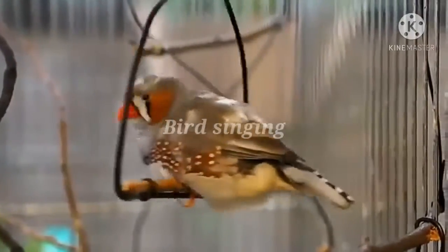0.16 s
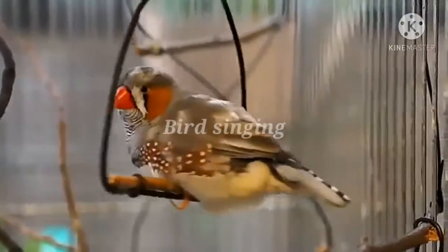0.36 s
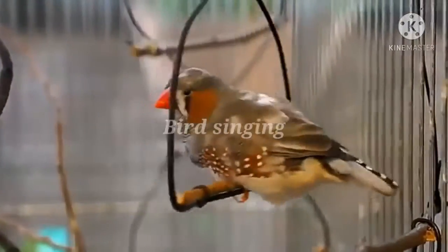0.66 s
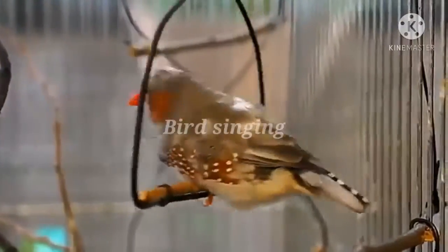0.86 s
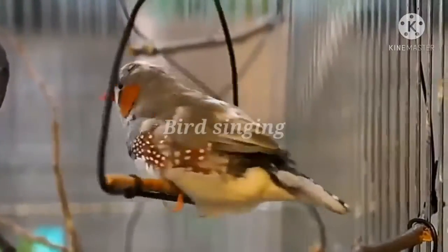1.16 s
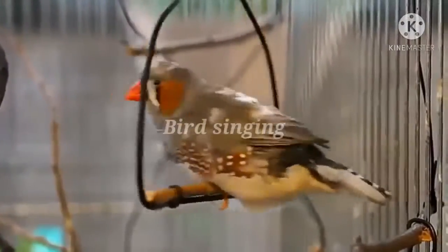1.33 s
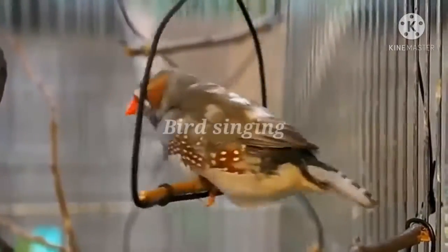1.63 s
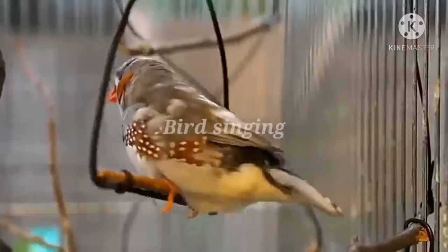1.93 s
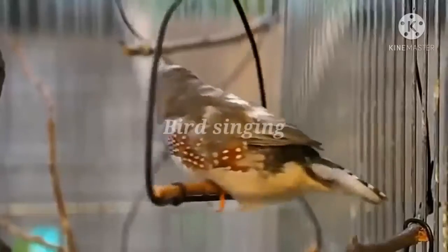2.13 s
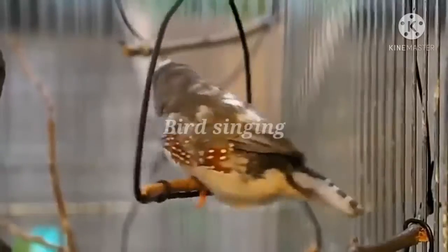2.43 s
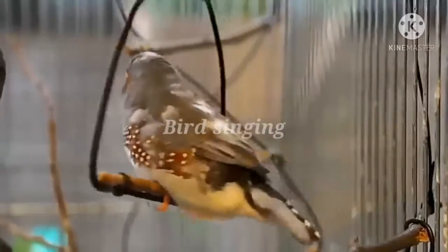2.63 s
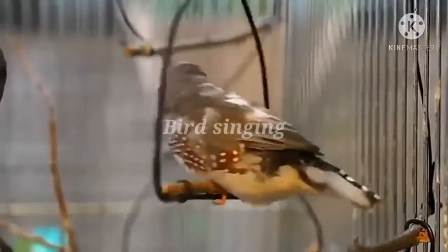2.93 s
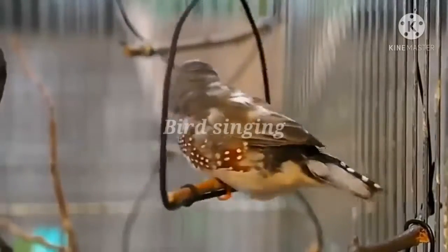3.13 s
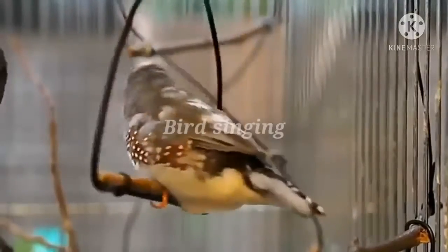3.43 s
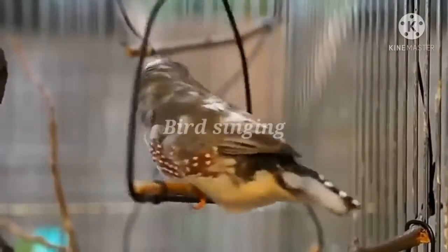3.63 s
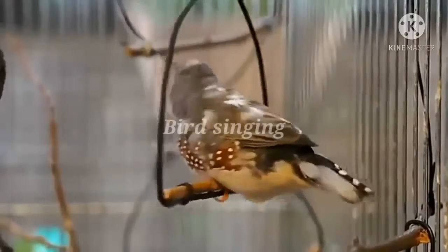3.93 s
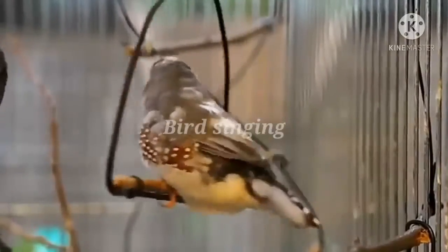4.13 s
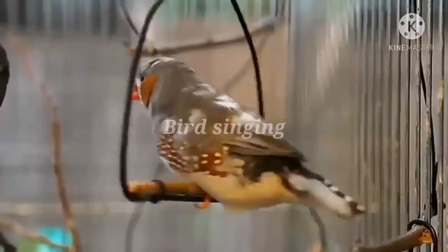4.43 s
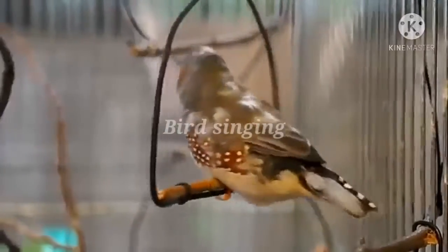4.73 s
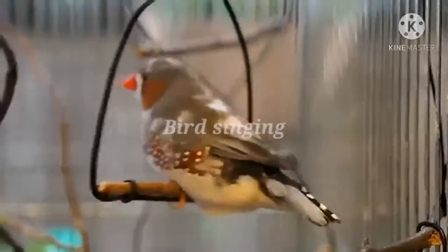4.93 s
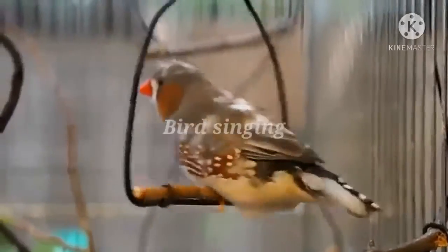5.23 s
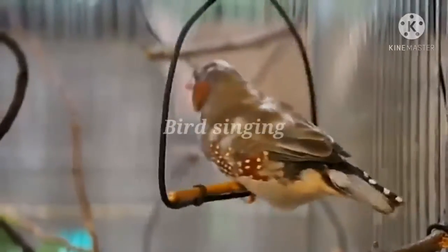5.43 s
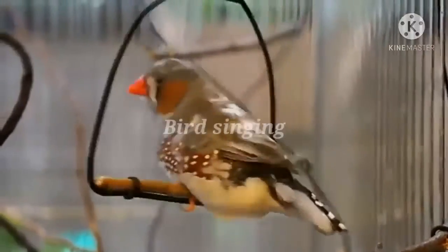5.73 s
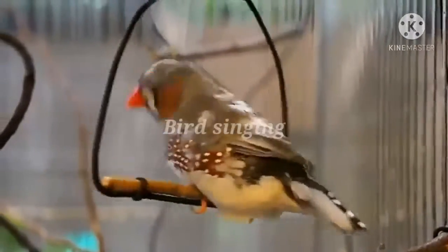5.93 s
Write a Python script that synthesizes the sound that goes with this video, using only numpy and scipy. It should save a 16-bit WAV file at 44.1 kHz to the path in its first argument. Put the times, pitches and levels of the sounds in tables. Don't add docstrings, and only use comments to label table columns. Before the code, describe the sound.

Indoors, close stereo pickup: a faint steady low motor hum and soft wash of air run throughout. A light wire tick comes at 0.66 s, then a zebra finch gives four quiet, raspy low notes at 0.73, 0.97, 1.12 and 1.26. From 1.4 the song quickens: short falling buzzes, a reedy note and slides into a piercing chirp at 1.72 that drops in steps, followed by a rasp and a held nasal note at 1.83. Similar chirps return at 2.41, 3.14 and 3.85, each followed by a level note; paired nasal beeps come around 2.75-2.95 and 4.2-4.4. A longer, louder call lasts from 4.52 to 4.7. A faint farther peep follows, then near quiet. Wires tick near 5.3, and soft buzzy opening notes resume from 5.55 to the end at about 6. Tiny bright ticks and dull swing knocks are scattered underneath, with a short room ring.

```python
import sys
import numpy as np
from scipy import signal
from scipy.fft import rfft, irfft
from scipy.io import wavfile
from scipy.ndimage import uniform_filter1d

SR = 44100
rng = np.random.default_rng(int(sys.argv[2]) if len(sys.argv) > 2 else 0)


def field_ratio(decibels):
    return 10 ** (np.asarray(decibels, dtype=float) / 20)


def inscribe(sig):
    pcm = np.round(np.clip(np.atleast_2d(sig).T, -1, 1) * 32767)
    wavfile.write(sys.argv[1], SR, pcm.astype(np.int16))


N = 268128


def evened(x):
    return x / np.sqrt(np.mean(abs(x) ** 2) + 1e-20)


def read(points, hz):
    f, value = np.transpose(points)
    return np.interp(np.log(hz + 1), np.log(f + 1), value)


def add(mix, s, sound):
    part = mix[round(s * SR):][:len(sound)]
    part += sound[:len(part)]


def blur(grid, bins, frames):
    return uniform_filter1d(uniform_filter1d(grid, bins, axis=0), frames, axis=1)


def drift(shape, hz):
    z = rng.standard_normal(shape + (2,)) @ [1, 1j]
    span = max(round(SR / hz / 2), 1)
    return evened(uniform_filter1d(uniform_filter1d(z, span, -1), span, -1))


# f/Hz, level/dB
HUM_TONES = [
    (240, -52),
    (480, -64),
    (720, -73),
]


def hum():
    out, t = np.zeros(N), np.arange(N) / SR
    turned = np.cumsum(1 + 0.0053 * drift(t.shape, 3.5).real) / SR
    for hz, db in HUM_TONES:
        swell = 1 + 0.24 * drift(t.shape, 28)
        out += field_ratio(db) * np.sqrt(2) * (swell * np.exp(2j * np.pi * hz * turned)).real
    return out


# f/Hz, level/dB per Hz
AIR_COLOUR = [(12, -59), (20, -24.5), (207, -8.5), (450, -13.5), (1010, -14.5), (1340, -20.5), (3540, -24),
              (15500, -34.5)]
# f/Hz, likeness (1 = the same)
AIR_LIKENESS = [(60, 0.64), (180, 0.71), (550, 0.87), (1650, 0.72), (4970, 0.094), (15000, 0.01)]


def air():
    frames, hz = N // 256 + 5, np.fft.rfftfreq(1024, 1 / SR)
    a, b, c, d, patches = rng.standard_normal((frames, 513, 5)).T
    patches = evened(blur(patches, 14, 16))
    same = np.clip(read(AIR_LIKENESS, hz), -1, 1)[:, None]
    left = a + 1j * b
    right = same * left + np.sqrt(1 - same ** 2) * (c + 1j * d)
    patch_db = 0.43 * patches * (hz > 150)[:, None]
    z = np.array([left, right]) * field_ratio(read(AIR_COLOUR, hz)[:, None] + patch_db)
    sound = signal.istft(z, nperseg=1024, noverlap=768)[1][:, :N]
    return field_ratio(-48.5) * evened(sound)


# t/s, peak level/dB, f/Hz, time to fade 60 dB/s
WIRE_TICKS = [
    (.664, -38, 5445, 0.011),
    (1.04, -37, 9300, 0.0098),
    (1.194, -31.5, 5860, 0.012),
    (1.7, -28.5, 11040, 0.026),
    (2.516, -27, 11050, 0.011),
    (3.84, -35, 9950, 0.036),
    (5.291, -39, 6240, 0.063),
    (5.295, -33, 7900, 0.047),
]
# t/s, peak level/dB, f/Hz, time to fade 60 dB/s
KNOCKS = [(1.6, -34, 132, 0.089), (1.648, -37.5, 907, 0.42), (1.68, -36, 329, 0.18),
          (1.72, -39, 138, 0.099), (2.8, -41, 131, 0.21), (3.62, -40, 156, 0.24),
          (3.74, -43.5, 134, 0.16), (4.35, -37.5, 479, 0.15), (5.3, -44.5, 2286, 0.67),
          (5.345, -44, 1100, 0.18), (5.72, -49, 114.2, 0.46)]


def cage():
    out, t = np.zeros(N), np.arange(8000) / SR
    for rows, spread in ((WIRE_TICKS, .9), (KNOCKS, .4)):
        for s, db, hz, t60 in rows:
            burst = (drift(t.shape, spread * hz) * np.exp(2j * np.pi * hz * t)).real
            rise = np.minimum(t * hz / 2, 1)
            add(out, s, field_ratio(db - 60 * t / t60) * burst * rise)
    return out


# f/Hz, level/dB
BEAK_COLOUR = [(300, -32), (600, -10), (1000, -1), (4000, -2), (6200, -3), (8300, -5.5), (11000, -7),
               (15000, -14)]


def syllable(row, gesture, width, boost_db, rise, pattern_db):
    s, length, peak_db, top_hz, throat_hz = row
    share, *columns = np.transpose(gesture)
    u = np.arange(round(share[-1] * length * SR)) / (length * SR)
    hz, rough, level_db = (np.interp(u, share, c) for c in columns)
    rough = np.clip(rough, 0, 1)

    jitter = (0.0076 + 0.027 * rough) * drift(u.shape, 287).real
    wander = 0.0078 * drift(u.shape, 48).real
    hz = top_hz * hz / hz.max() * (1 + jitter + wander)
    throat_hz = np.maximum(throat_hz * (hz / top_hz) ** 0.099, 1.2 * hz)

    k = np.arange(1, min(16000 // hz.min(), 40) + 1)[:, None]
    partial_hz = k * hz
    off_throat = np.log2(partial_hz / throat_hz) / width
    colour_db = read(BEAK_COLOUR, partial_hz) + boost_db * np.exp(-.5 * off_throat ** 2)
    colour_db[:len(pattern_db)] += np.array(pattern_db)[:, None]
    colour_db += 0.39 * (peak_db + level_db + 12.0) * np.clip(np.log2(partial_hz / 4500), 0, 1)
    gains = field_ratio(colour_db) * (partial_hz < .4 * SR)

    flutter = 1 + .6 * np.minimum(partial_hz / 2500, 1) * drift(gains.shape, 110)
    rough = np.clip(rough + .1 * (partial_hz / 9000) ** 3, 0, 1)
    breath = np.minimum(partial_hz / 2600, 1) ** 2 * drift(gains.shape, 700)
    smear = np.sqrt(1 - rough) * flutter + np.sqrt(rough + 0.0014) * breath

    lag = 1.63 + 1.4 * (k * top_hz / 2000) ** 2
    phase = 2 * np.pi * k * np.cumsum(hz) / SR + lag
    voice = (gains * smear * np.exp(1j * phase)).real.sum(0)
    voice /= np.sqrt((gains ** 2).sum(0))
    fade_in = (u * length / rise) ** 1.5
    fade_out = (u[-1] - u) * length / .011
    return voice * field_ratio(peak_db + level_db) * np.minimum(1, np.minimum(fade_in, fade_out))


def sing(rows, gesture, width, boost_db, rise, pattern_db):
    out = np.zeros(N)
    for row in rows:
        add(out, row[0], syllable(row, gesture, width, boost_db, rise, pattern_db))
    return out


# share of the length, f/Hz, roughness 0-1, effort level/dB
MURMURS = [
    (2.22, .016, -29, 948, 920),
    (4.7, 0.026, -39, 912, 1350),
]


def far_birds():
    return sing(MURMURS, TET_GESTURE, .6, 19, .0028, [9.4, -0.8])


INTRO_GESTURE = [(0, 420, .55, -10), (.4, 380, 0.6, -1), (.45, 557, 0.46, -1.5), (.75, 492.4, 0.3, -0.5),
                 (1, 441, 0.6, -1)]
INTROS = [(.732, 0.06, -34, 552, 2660), (0.973, 0.055, -34.5, 560, 2800), (1.117, 0.058, -30.5, 563, 2792),
          (1.256, 0.06, -29, 571, 2730), (5.601, .056, -29.5, 551.4, 2900), (5.738, 0.063, -29, 557, 2780)]


def intros():
    return sing(INTROS, INTRO_GESTURE, 0.26, 12.8, 0.0028, [8.5, 6.5, -5, 5.5, -3.5, -1, -10, -2])


TET_GESTURE = [
    (0, 685, 0.41, -6),
    (.5, 635.3, 0.71, -3.5),
    (1, 567, .35, -0.5),
]
TETS = [(1.375, .031, -29.5, 692, 2550), (1.589, 0.037, -30.5, 636, 2550), (1.997, 0.027, -30, 1015, 3000),
        (2.07, 0.021, -25, 965, 3250), (2.272, 0.037, -29, 657, 2600), (3.493, 0.033, -29.5, 656, 2900),
        (3.711, 0.036, -29.5, 709, 3250), (5.863, 0.038, -28.5, 679, 2650)]


def tets():
    return sing(TETS, TET_GESTURE, 0.52, 9.3, 0.0028, [6, 4, -1.5, 4, -9, -8, -4, 0.5])


STACK_GESTURE = [(0, 455, .08, -7.5), (.5, 496.8, 0.035, 0), (.8, 493, .08, 1), (1, 455, 0.4, 6.5)]
STACKS = [(1.468, 0.07, -29.5, 481.4, 2960), (2.114, 0.11, -30, 496.6, 3080),
          (3.589, .075, -27, 495.6, 3190), (5.549, 0.076, -37.5, 521, 1990),
          (5.97, 0.078, -29.5, 490.6, 3040)]


def stacks():
    return sing(STACKS, STACK_GESTURE, 0.42, 17.3, 0.0043, [10.5, 7.5, -2.5, 4, 1.5, -1.5, -5, -2.5])


RISE_GESTURE = [(0, 516.3, .15, -10), (.3, 537.5, .04, -6), (.7, 545, .04, -6), (1, 535, .2, 2.5)]
RISES = [(3.19, 0.068, -15.5, 560, 2900), (3.811, 0.059, -22, 549, 2080)]


def rises():
    return sing(RISES, RISE_GESTURE, 0.73, 8.5, 0.0025, [-1.5, -8, -6.5, -1.5, -5, 8.5, 0.5, 5.5])


PEEP_GESTURE = [(0, 450, .1, -1.5), (.5, 444, .05, 4.5), (1, 449, .15, 4)]
PEEPS = [(2.673, .042, -31.5, 441.5, 2320), (4.112, .037, -32, 450.5, 2310)]


def peeps():
    return sing(PEEPS, PEEP_GESTURE, 0.45, 28, 0.0045, [0, 21.5, 16, -7, 8.5, -14, 22.5, 20])


SLIDE_GESTURE = [
    (0, 646, 0.62, -6),
    (.55, 629, .15, -0.5),
    (1, 580, .5, -10.5),
]
SLIDES = [(1.65, 0.052, -23.5, 633, 3750), (2.342, 0.035, -23, 626, 3200), (3.072, .03, -23, 625, 3150),
          (3.779, 0.037, -22.5, 632, 3200)]


def slides():
    return sing(SLIDES, SLIDE_GESTURE, 0.89, 11.3, 0.0014, [-3, 2, 6.5, 6.5, 2.5, 1.5, 7, 3.5])


CHIRP_GESTURE = [(0, 5470, 0.26, -6.5), (.08, 6270, 0.21, -2.5), (.17, 6310, 0.53, -3),
                 (.18, 3508, 0.78, -7.5), (.27, 3505, 0.56, -7), (.38, 3550, .6, -12),
                 (.39, 2254, .6, -9.5), (.65, 1608, 0.83, -21), (1.25, 884, 0.62, -11)]
CHIRPS = [(1.722, .04, -13.5, 6280, 3280), (2.411, 0.046, -14.5, 6260, 3440),
          (3.137, .043, -11.5, 6440, 3720), (3.849, 0.037, -14.5, 6260, 2380)]


def chirps():
    return sing(CHIRPS, CHIRP_GESTURE, 0.36, 10.6, 0.00075, [6.3, -4.5, -2])


RASP_GESTURE = [
    (0, 603, 1, -6),
    (.3, 595, 0.68, -1),
    (1, 606, 1, 3.5),
]
RASPS = [(1.765, 0.032, -34, 579, 3200), (2.453, 0.036, -31, 617, 3700), (3.891, .033, -31, 598, 3700)]
CATCHES = [(1.714, .015, -21.5, 590, 6300), (2.401, 0.0086, -31.5, 640, 7790),
           (3.13, .009, -18.5, 612, 5000), (3.839, 0.02, -26, 603, 8600)]


def rasps_and_catches():
    rasps = sing(RASPS, RASP_GESTURE, 0.24, 19, 0.0045, [0])
    catches = sing(CATCHES, RASP_GESTURE, 0.29, 15, 0.0031, [0])
    return rasps + catches


FLAT_GESTURE = [(0, 979, 0.33, 0.5), (.08, 1099, 0.51, -3.5), (.35, 1165, .02, -1),
                (.75, 1202, 0.015, -1.5), (.99, 1195, 0.024, -3), (1.03, 956, .2, 1),
                (1.2, 860, 0.44, -5.5), (1.35, 770, 0.89, -3), (1.75, 708, 0.75, -28)]
FLATS = [(1.826, 0.07, -18, 1207, 3970), (2.516, .071, -18, 1223, 4300), (3.247, .067, -18.5, 1209, 4200),
         (3.953, 0.072, -18, 1214, 4020)]


def flats():
    return sing(FLATS, FLAT_GESTURE, 0.73, 11.6, 0.0027, [2.5, 3.5, 4.5, -1, 5])


TWIN_GESTURE = [(0, 983, .84, -2), (.12, 1132, 0.97, 2), (.3, 1181, .027, 1), (.99, 1192, 0.01, -.5),
                (1.05, 998, .06, 3.5), (1.25, 830, .35, -3), (1.4, 776.5, 0.75, -4), (1.8, 688, 0.79, -3)]
TWINS = [
    (2.743, .061, -17.5, 1198, 4830),
    (2.887, .063, -18.5, 1187, 4780),
    (4.18, .06, -18.5, 1201, 4530),
    (4.33, 0.061, -18.5, 1175, 4600),
]


def twins():
    return sing(TWINS, TWIN_GESTURE, 0.53, 13.6, 0.0016, [6.5, 7, 7, 7, 2.5, 0])


CALL_GESTURE = [(0, 749, 0.21, -7.5), (.15, 833, 0.056, -2.5), (.4, 889, 0.043, -1), (.7, 875, 0.22, -1),
                (1, 871, .4, -2.5)]
LONG_CALLS = [(4.518, .187, -16, 889.8, 3870)]


def long_calls():
    return sing(LONG_CALLS, CALL_GESTURE, 0.62, 15.8, 0.0076, [3, 3.5, 2, 5.5, 3.5, -1, -4.5, -5])


def finch():
    low = intros() + tets() + stacks() + rises() + peeps()
    high = slides() + chirps() + rasps_and_catches() + flats() + twins() + long_calls()
    return low + high


# f/Hz, time to fade 60 dB/s
ROOM_RING = [(500, .4), (2000, .36), (5000, .38), (10000, .28)]
# f/Hz, level/dB
WALL_COLOUR = [(800, 3), (1800, -1.5), (3500, -4.5), (6000, -1.5), (12000, 0)]
# delay t/s, left gain, right gain
NEAR_ECHOES = [(.0011, .3, -.15), (.0023, -.1, .3), (.0047, .25, .1), (.0081, -.2, .15), (.013, .1, -.18)]


def room(x, tail_db):
    taps = np.zeros((2, SR))
    at = np.arange(500, SR - 20, 20) + rng.integers(0, 20, (2, (SR - 501) // 20))
    np.put_along_axis(taps, at, rng.choice([-1., 1.], at.shape), 1)
    taps = taps + 0.28 * taps[::-1]
    hz, t, z = signal.stft(taps, SR, nperseg=256)
    fade_db = read(WALL_COLOUR, hz)[:, None] - 60 * t / read(ROOM_RING, hz)[:, None]
    tail = signal.istft(z * field_ratio(fade_db), SR, nperseg=256)[1]
    tail *= field_ratio(tail_db) / np.linalg.norm(tail[0])
    tail[:, 0] += field_ratio(np.array([.3, -.3]))
    for s, left, right in NEAR_ECHOES:
        tail[:, round(s * SR)] += left, right
    return signal.fftconvolve(x[None], tail, axes=1)[:, :N]


# f/Hz, level/dB
PORT_DIFFERENCE = [(500, -25), (1200, -33), (2500, -6), (5000, -0.5), (9000, 0.5), (14000, 2.5)]


def ports(pair):
    mid, side = (pair[0] + pair[1]) / 2, (pair[0] - pair[1]) / 2
    side = irfft(rfft(side) * field_ratio(read(PORT_DIFFERENCE, np.fft.rfftfreq(N, 1 / SR))), N)
    return np.array([mid + side, mid - side])


def thin_treble(x, under_db):
    hz, t, z = signal.stft(x, SR, nperseg=1024)
    power_db = 10 * np.log10(blur((abs(z) ** 2).mean(0), 9, 3) + 1e-20)
    luck = evened(blur(rng.standard_normal(power_db.shape), 9, 5))
    below_peak_db = power_db - power_db[hz > 1000].max(0)
    weak = (below_peak_db + 6 * luck < under_db) & (hz > 8300)[:, None]
    return signal.istft(z * ~weak, SR, nperseg=1024)[1][:, :N]


def scene():
    in_room = room(far_birds() + finch() + cage(), tail_db=-6.5)
    hum_pair = hum() * field_ratio(np.array([[.3], [-.3]]))
    return ports(in_room) + air() + hum_pair


def roll_off(x):
    return signal.sosfilt(signal.butter(12, 16360, fs=SR, output="sos"), x)


def record(dry):
    lowpass = signal.firwin(255, 15250, window=("kaiser", 8), fs=SR)
    mix = signal.oaconvolve(dry, lowpass[None], "same")
    mix = thin_treble(mix, under_db=-39)
    return roll_off(mix)


dry = scene()
out = record(dry)
inscribe(out)
```